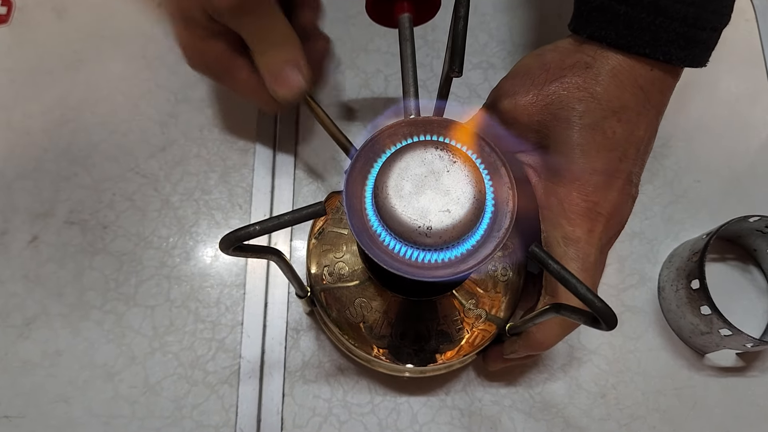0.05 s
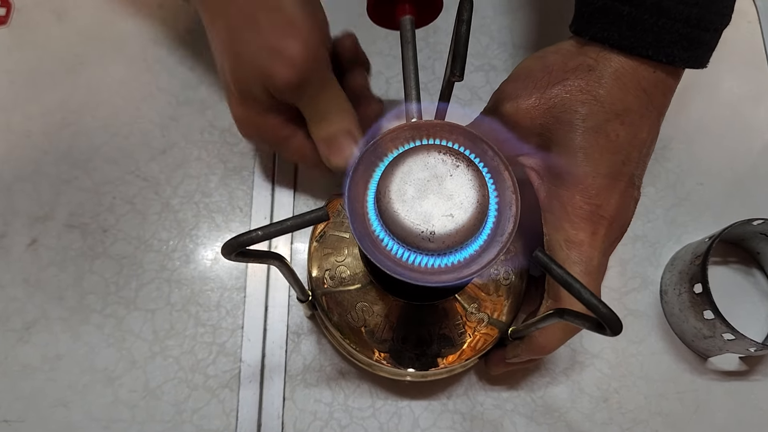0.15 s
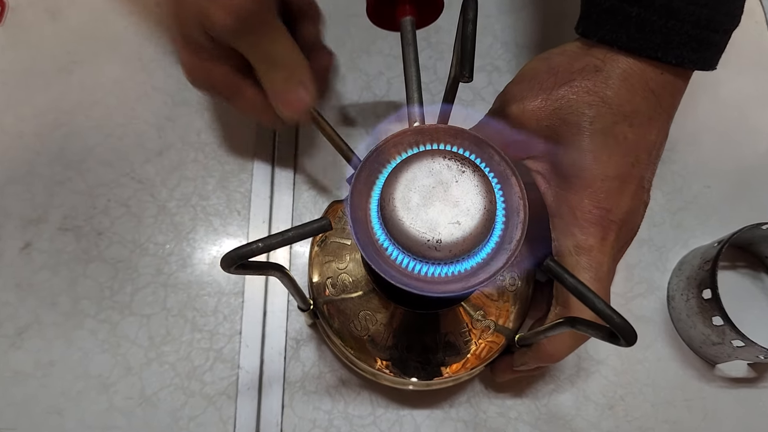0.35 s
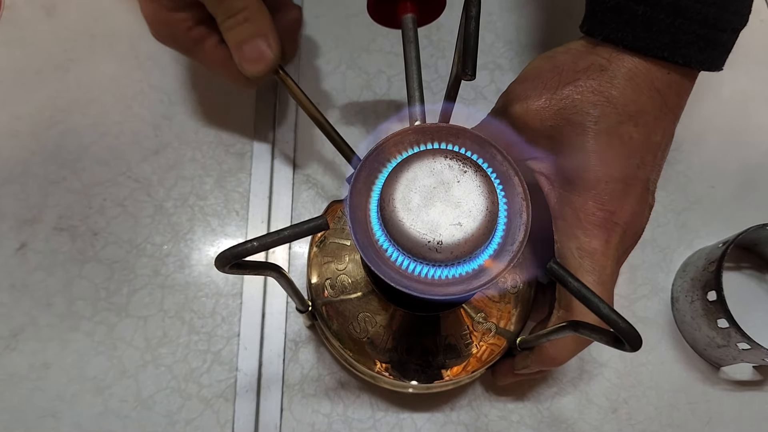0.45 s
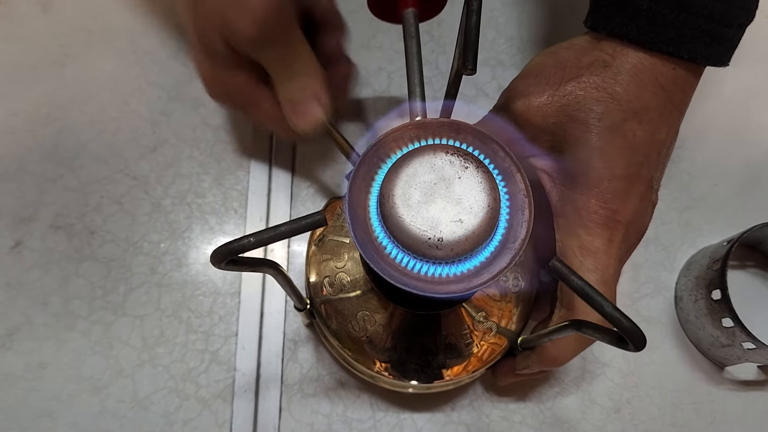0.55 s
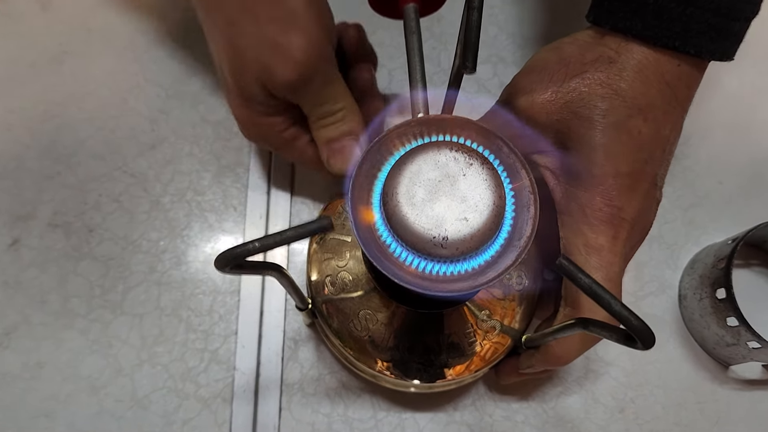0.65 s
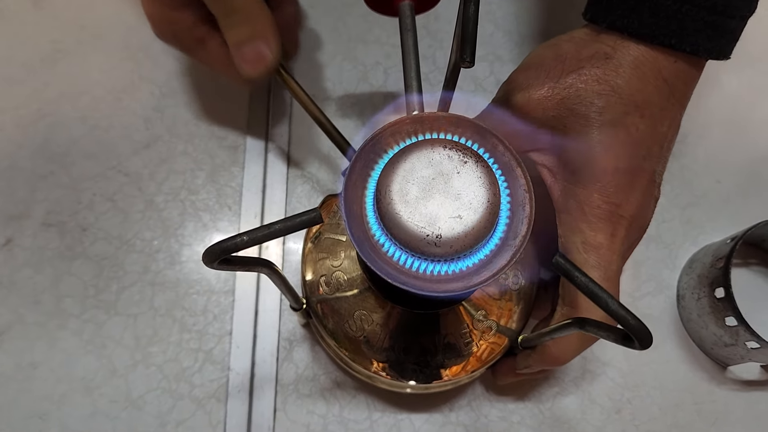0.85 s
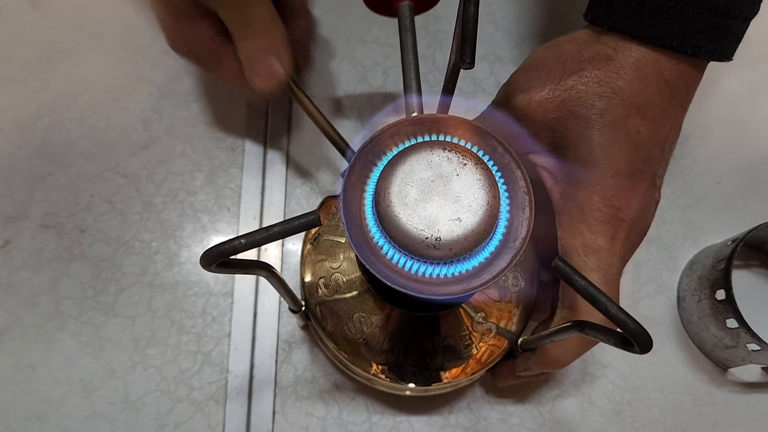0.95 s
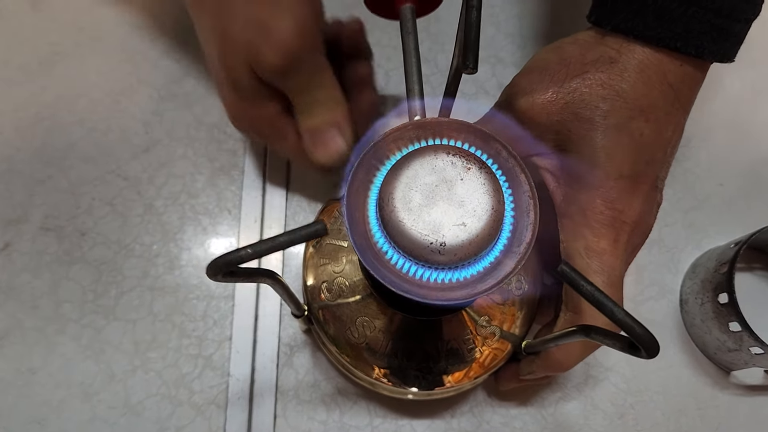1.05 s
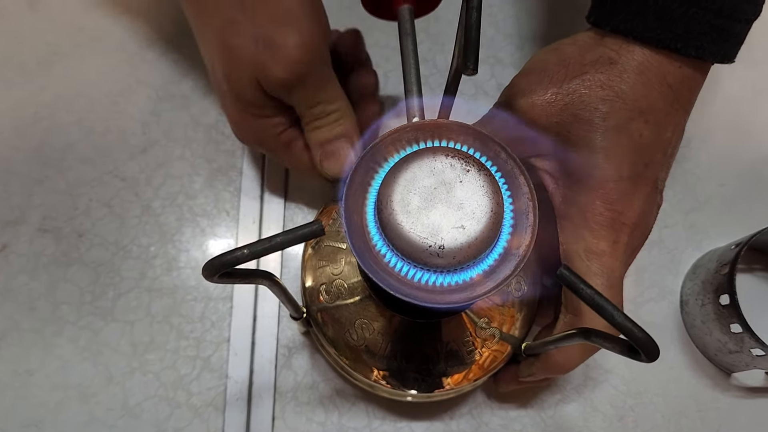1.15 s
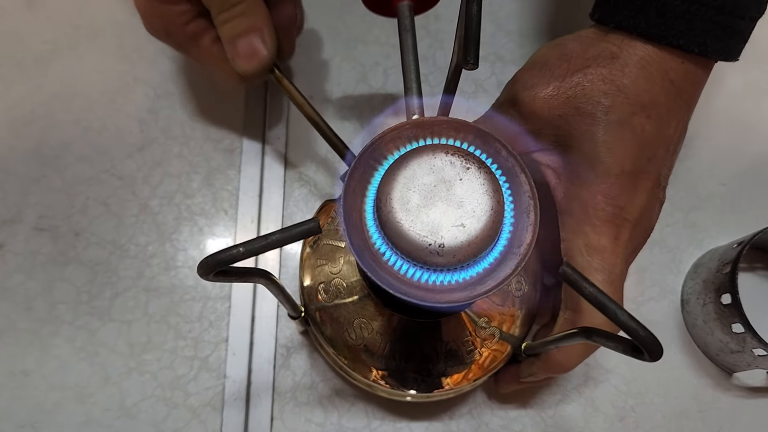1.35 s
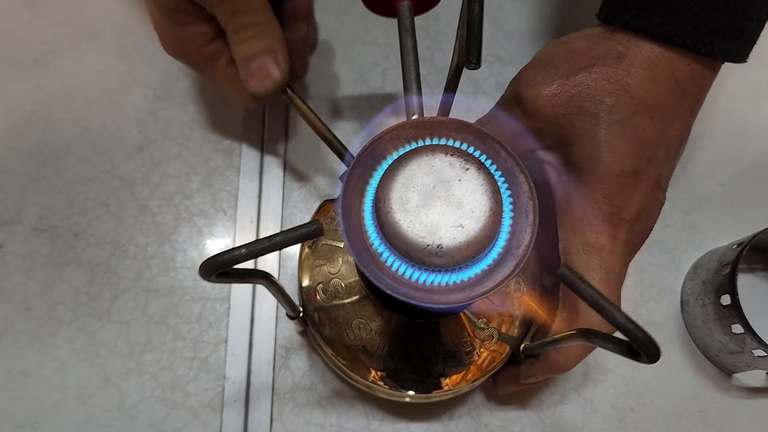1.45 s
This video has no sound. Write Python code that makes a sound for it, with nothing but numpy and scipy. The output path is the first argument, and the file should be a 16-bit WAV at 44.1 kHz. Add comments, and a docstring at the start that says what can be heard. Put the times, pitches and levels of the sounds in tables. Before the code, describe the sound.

A small kerosene stove is pumped three times, each push a short squeak ending in a metallic knock. The rod taps lightly on its way back, while the burner hisses softly, close up in a small room.

```python
"""Pumping a kerosene stove

A small brass stove burns on a table: a low flame roar under the steady hiss of its vapour jet.
A hand works the pump three times. The rod rubs in its guide, air squeaks past the valve, and the
plunger knocks home, ringing the metal and jolting the stove. On the way back the rod taps lightly."""
import sys
import numpy as np
from scipy import signal
from scipy.fft import rfft, irfft
from scipy.io import wavfile
from scipy.ndimage import uniform_filter1d

SR = 44100
rng = np.random.default_rng(int(sys.argv[2]) if len(sys.argv) > 2 else 0)


def output_pcm(signal):
    """Save a mono or channel-first signal as 16-bit PCM at the path in sys.argv[1].

    Samples are clipped to [-1, 1] before scaling.
    """
    pcm = np.clip(np.atleast_2d(signal).T, -1, 1) * 32767
    wavfile.write(sys.argv[1], SR, np.round(pcm).astype(np.int16))


N = 66150
FREQS = np.fft.rfftfreq(N, 1 / SR)


def amp(db):
    """Decibels to gain."""
    return 10 ** (np.asarray(db) / 20)


def unit(x):
    """Scales to rms 1."""
    return x / np.sqrt(np.mean(x ** 2) + 1e-20)


def curve(points, hz=FREQS):
    """Reads a table on a log-frequency axis."""
    f, value = np.transpose(points)
    return np.interp(np.log(hz + 1), np.log(f + 1), value)


def add(mix, start, sound):
    """Mixes a sound in at start seconds."""
    part = mix[:, max(round(start * SR), 0):][:, :sound.shape[-1]]
    part += sound[..., :part.shape[1]]


def pan(lean_db):
    """Left and right gains, lean_db apart."""
    return amp(np.array([[0.5], [-0.5]]) * lean_db)


def drift(n, hz):
    """Random wander, rolled off above hz."""
    return unit(irfft(rfft(rng.standard_normal(N)) / (1 + (FREQS / hz) ** 4), N))[:n]


def fade(x, t60s):
    """Lets each band die away at its own speed."""
    hz, t, bands = signal.stft(x, SR, nperseg=128)
    return signal.istft(bands * amp(-60 * t / curve(t60s, hz)[:, None]), SR, nperseg=128)[1]


# Stereo focus of the noises: (frequency [Hz], left-right likeness [0-1])
LIKENESS = [(200, 0.98), (450, 0.96), (800, 0.88), (1300, 0.7), (2400, 0.5), (4400, 0.08), (15000, 0.03)]

def noise(gain, lean_db):
    """Stereo noise shaped by a gain per frequency, focused in the bass and diffuse in the treble."""
    mid, side = np.exp(2j * np.pi * rng.random((2, len(FREQS))))
    likeness = curve(LIKENESS)
    side *= np.sqrt((1 - likeness) / (1 + likeness))
    x = irfft(np.array([mid + side, mid - side]) * pan(lean_db) * gain, N)
    return x / x.mean(0).std()


def shimmer(x, ripple_db=2.2, patch_db=1.7):
    """Reflections off stove and table comb the hiss, and the jet's colour wanders in slow patches."""
    bands = signal.stft(x, nperseg=2048)[2]
    ripple = rng.standard_normal((2, bands.shape[1], 1))
    ripple = unit(uniform_filter1d(uniform_filter1d(ripple, size=7, axis=1), size=3, axis=1))
    patches = rng.standard_normal(bands.shape)
    patches = unit(uniform_filter1d(uniform_filter1d(patches, size=14, axis=1), size=6, axis=2))
    bands *= amp(ripple_db * ripple + patch_db * patches)
    return unit(signal.istft(bands, nperseg=2048)[1][:, :N]) * x.std()


# Tone of the flame: (frequency [Hz], relative level [dB])
ROAR_EQ = [(13, -43), (22, -23), (81, 3), (118, -2), (171, -8.5), (313, 0.5), (433, -3.5), (553, -10.5),
           (937, -6.5), (1270, -9), (1560, -17), (2290, -14), (2800, -31.5), (3640, -80), (6160, -120)]
# Swells of the flame: (time [s], relative level [dB])
ROAR_SWELL = [(0, -2), (0.3, -1), (0.55, -1), (0.7, 4), (0.95, -1.5), (1.25, 1.5), (1.5, 0.5)]
# Tone of the jet: (frequency [Hz], relative level [dB])
HISS_EQ = [(1650, -39), (2800, -10), (3310, -1.5), (3610, -4), (4550, -5.5), (4750, 0), (5110, -4),
           (5730, 2), (6920, -9.5), (7720, -5), (8660, -7), (11100, -4.5), (12600, -5), (14900, -5.5),
           (15800, -7.5)]
# Slow rise of the jet: (time [s], level [dB])
HISS_SWELL = [(0, -47), (0.2, -45.5), (0.36, -45.5), (0.9, -44.5), (1.42, -44.5)]
# Stereo balance of the burner: (frequency [Hz], left minus right [dB])
BURNER_PAN = [(60, 3.5), (87, -0.5), (130, 0.5), (180, 1.5), (260, 1), (380, -2.5), (550, 3), (790, 2.0),
              (1140, 1.5), (1650, 5.5), (2380, 3.5), (3440, 5), (4970, -1.5), (7180, 6), (10400, 3.5),
              (15000, 0)]

def burner(roar_db=-41.5):
    """The flame roars unevenly under the hiss of the vapour jet, which grows as the pressure rises."""
    t = np.arange(N) / SR
    roar = noise(amp(curve(ROAR_EQ)), curve(BURNER_PAN))
    hiss = shimmer(noise(amp(curve(HISS_EQ)), curve(BURNER_PAN)))
    roar *= amp(roar_db + np.interp(t, *np.transpose(ROAR_SWELL)) + drift(N, hz=35))
    hiss *= amp(np.interp(t, *np.transpose(HISS_SWELL)))
    return roar + hiss


# One squeak a push: (time [s], gain [dB], base pitch [Hz], length [s], octave overtone [dB],
# accent on the opening flick [dB])
SQUEAK_CUES = [(0.2055, -7.5, 959.5, 0.069, -29.5, -3), (0.6632, -9.0, 970, 0.065, -27.5, -1.5),
               (1.1215, -10.5, 968.6, 0.069, -22.5, 1)]
# The valve flicks open, catches, then sings:
# (progress [0-1], pitch [ratio], relative level [dB], left minus right [dB])
SQUEAK_SHAPE = [(0, 0.92, -22, 5), (0.077, 1.174, -7, 2.5), (0.138, 1.23, -22, 9), (0.184, 1.067, -7.5, -3),
                (0.249, 0.98, -2.5, 2), (0.298, 1.019, -7, 1), (0.357, 1.006, -2.5, 5),
                (0.46, 1.0, -3.5, -5), (0.558, 1.0, -7, -4.5), (0.63, 1.18, -23, -3), (0.78, 1.0, -20, 0),
                (1, 0.96, -34, -2)]
# Tank resonances: (frequency [Hz], width [Hz], gain of the added peak [dB])
TANK_PEAKS = [(780, 55, 4), (1052, 46, 1), (1215, 70, 0), (2250, 70, 10)]

def valve(waver=0.015, flutter_db=0.65, air_db=-29.5, right_lag_s=0.0001):
    """Air forced past the valve makes it sing, sharp at first, then settling; the tank colours it."""
    out = np.zeros((2, N))
    marks, ratio, shape_db, lean_db = np.transpose(SQUEAK_SHAPE)
    for start, db, hz, length, octave_db, flick_db in SQUEAK_CUES:
        progress = np.arange(0, length, 1 / SR) / length
        n = len(progress)
        pitch = hz * np.interp(progress, marks, ratio) * (1 + waver * drift(n, hz=250))
        phase = 2 * np.pi * (np.cumsum(pitch) / SR - np.array([[0], [right_lag_s]]) * pitch)
        tone = np.sin(phase) + amp(octave_db) * np.sin(2 * phase) + amp(air_db) * drift(n, hz=2600)
        level = db + np.interp(progress, marks, shape_db) + flick_db * (progress < marks[2])
        level += flutter_db * drift(n, hz=239)
        add(out, start, tone * amp(level) * pan(np.interp(progress, marks, lean_db)))
    tank = 1 + sum(amp(db) / (1 + 2j * (FREQS - hz) / width) for hz, width, db in TANK_PEAKS)
    return irfft(rfft(out) * tank, N)


# Short scrapes of the rod: (time [s], length [s], level [dB])
RUB_CUES = [(0.213, 0.022, -44), (0.608, 0.066, -46), (0.663, 0.023, -39), (1.061, 0.04, -44),
            (1.103, 0.056, -46)]
# Rod resonances: (frequency [Hz], width [Hz], relative level [dB])
ROD_PEAKS = [(2254, 230, -1.5), (3360, 270, 0.5), (5700, 1200, -17.5)]

def rod_rubs(grit_db=2.6):
    """Uneven friction in the guide stirs the rod's resonances."""
    out = np.zeros((2, N))
    colour = sum(amp(db) / (1 + (2 * (FREQS - hz) / width) ** 2) for hz, width, db in ROD_PEAKS)
    for start, length, db in RUB_CUES:
        progress = np.arange(0, length, 1 / SR) / length
        rub = noise(colour, lean_db=4)[:, :len(progress)]
        level = db + grit_db * drift(len(progress), hz=121)
        add(out, start, rub * np.sin(np.pi * progress) ** 0.24 * amp(level))
    return out


# Metal ring of pump and tank: (frequency [Hz], relative level [dB], t60 [s])
PUMP_MODES = [(304, -13.5, 0.059), (789.5, -11, 0.0415), (929, -2, 0.045), (1025, -15, 0.048),
              (1195, -11, 0.022), (1664, -9, 0.019), (2270, -24, 0.056), (3310, -19, 0.037),
              (5210, -20.5, 0.025), (6027, -22, 0.022)]

def pump_ring(cutoff_hz, rise_s):
    """The pump's modes after a blow; a soft blow leaves the high ones quiet."""
    t = np.arange(SR // 5) / SR
    ring = np.zeros((2, len(t)))
    for hz, db, t60 in PUMP_MODES:
        mode = amp(db - 60 * t / t60) * np.sin(2 * np.pi * hz * t) / (1 + (hz / cutoff_hz) ** 2)
        ring += mode * pan(lean_db=4 + 2 * rng.standard_normal() * min(hz / 3000, 1))
    return ring * (1 - np.exp(-t / rise_s))


# End of each push: (time [s], ring gain [dB], crack gain [dB], crack cutoff [Hz], ping gain [dB])
KNOCK_CUES = [(0.2644, -10.5, -24.5, 9800, -32), (0.7257, -11.5, -25.5, 9800, -30),
              (1.1983, -23.5, -26.5, 2720, -29.5)]
# Tone of the crack: (frequency [Hz], relative level [dB])
CRACK_EQ = [(300, 7), (900, 0.5), (1750, 2), (2700, -14), (3400, -5.5), (4500, -10), (5600, -8.5),
            (7000, -16.5), (11000, -7), (16000, -35)]
# Tail of the crack: (frequency [Hz], t60 [s])
CRACK_DECAY = [(500, 0.03), (3400, 0.059), (8000, 0.08), (16000, 0.02)]

def plunger_knocks(ping_hz=3413, ping_t60_s=0.032, ping_rise_s=0.0012):
    """The plunger hits home: the rod pings, the pump rings and metal cracks on metal."""
    out = np.zeros((2, N))
    t = np.arange(SR // 10) / SR
    for start, ring_db, crack_db, cutoff_hz, ping_db in KNOCK_CUES:
        ping = np.sin(2 * np.pi * ping_hz * t) * np.minimum(t / ping_rise_s, 1)
        add(out, start, ping * amp(ping_db - 60 * t / ping_t60_s))
        add(out, start, amp(ring_db) * pump_ring(cutoff_hz=9000, rise_s=0.0007))
        colour = amp(curve(CRACK_EQ)) / (1 + (FREQS / cutoff_hz) ** 6)
        crack = noise(colour, lean_db=2)[:, :len(t)]
        add(out, start, amp(crack_db) * fade(crack, CRACK_DECAY))
    return out


# Bumps of stove and table: (time [s], level [dB], length [s], bass shelf [dB])
JOLT_CUES = [(0.265, -29.5, 0.052, 3), (0.296, -32, 0.063, -1.5), (0.335, -37.5, 0.081, 10.5),
             (0.717, -34, 0.1, 12), (0.77, -33.5, 0.033, -1), (0.803, -44, 0.084, 12),
             (1.056, -38, 0.073, 1), (1.172, -38.5, 0.094, -1), (1.284, -38.5, 0.016, -11),
             (1.363, -33.5, 0.057, 7.5)]
# Tone of a bump: (frequency [Hz], relative level [dB])
JOLT_EQ = [(20, 7.5), (45, 0.5), (110, 0.5), (170, -5), (240, 1), (340, 5.5), (480, -3.5), (650, -8),
           (950, -4.5), (1500, -24.5), (4000, -30)]

def stove_jolts(shelf_hz=160):
    """The stove shifts on the table with dull bumps, some deep, some thinner."""
    out = np.zeros((2, N))
    for start, db, length, bass_db in JOLT_CUES:
        progress = np.arange(0, length, 1 / SR) / length
        colour = amp(curve(JOLT_EQ) + bass_db / (1 + (FREQS / shelf_hz) ** 4))
        rumble = noise(colour, lean_db=1)[:, :len(progress)]
        add(out, start, rumble * np.sin(np.pi * progress ** 0.43) * amp(db))
    return out


# Light taps on the return stroke: (time [s], ring gain [dB])
TAP_CUES = [(0.381, -24.5), (0.412, -21), (0.775, -30), (0.806, -21.5), (1.3645, -14)]

def rod_taps():
    """The returning rod strikes the pump softly, for a duller ring."""
    out = np.zeros((2, N))
    for start, db in TAP_CUES:
        add(out, start, amp(db) * pump_ring(cutoff_hz=1830, rise_s=0.002))
    return out


# Reverb time: (frequency [Hz], t60 [s])
ROOM_DECAY = [(100, 0.083), (1000, 0.12), (8000, 0.2)]

def room(x, predelay_s=0.005, crossfeed=0.54):
    """A short diffuse tail from a small room."""
    t = np.arange(SR // 2) / SR
    tail = fade(rng.standard_normal((2, len(t))) * (t > predelay_s), ROOM_DECAY)
    tail = tail + crossfeed * tail[::-1]
    return signal.fftconvolve(x, tail / np.linalg.norm(tail[0]), axes=1)[:, :N]


def scene(squeak_send_db=-21, metal_send_db=-14):
    """Burner and pump up close, with a touch of room on the squeaks and the metal."""
    squeaks = valve()
    metal = rod_rubs() + plunger_knocks() + rod_taps()
    reverb = room(amp(squeak_send_db) * squeaks + amp(metal_send_db) * metal)
    return burner() + squeaks + metal + stove_jolts() + reverb


def record(dry):
    """Trims the deepest rumble and the very top of the hiss."""
    low_cut = signal.butter(4, 35, "highpass", fs=SR, output="sos")
    high_cut = signal.firwin(511, 15790, window=("kaiser", 9), fs=SR)
    return signal.oaconvolve(signal.sosfilt(low_cut, dry), high_cut[None], "same")


dry = scene()
out = record(dry)
output_pcm(out)
```